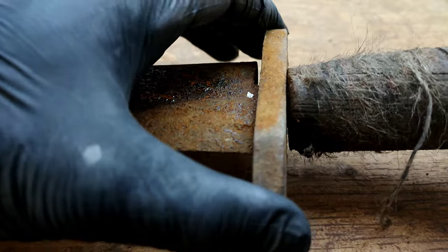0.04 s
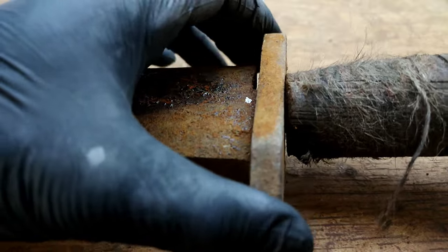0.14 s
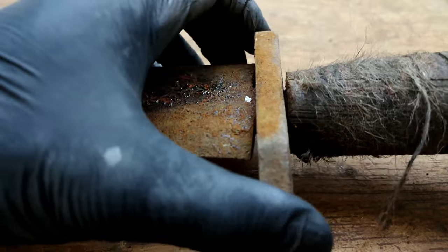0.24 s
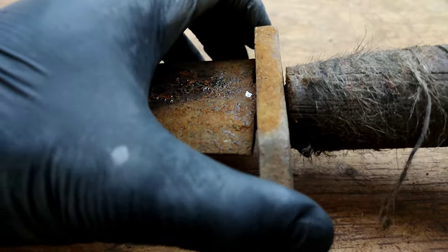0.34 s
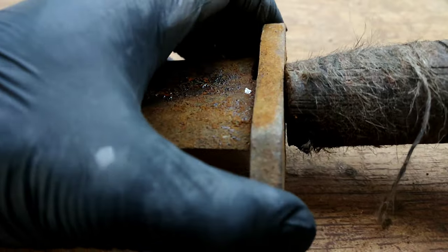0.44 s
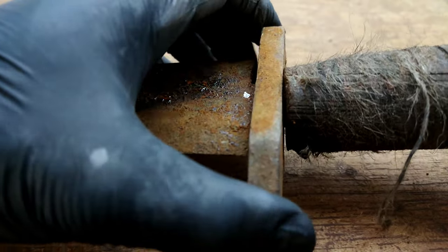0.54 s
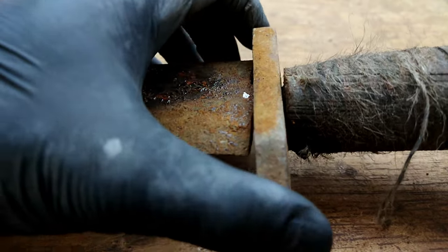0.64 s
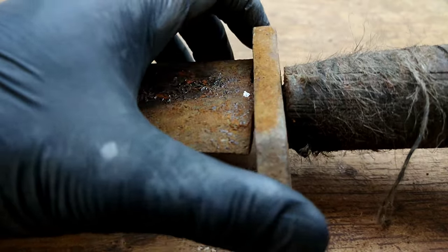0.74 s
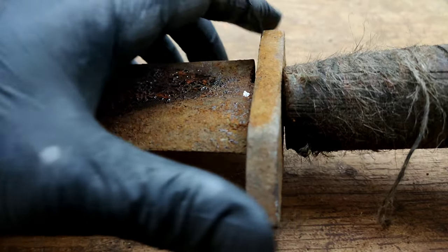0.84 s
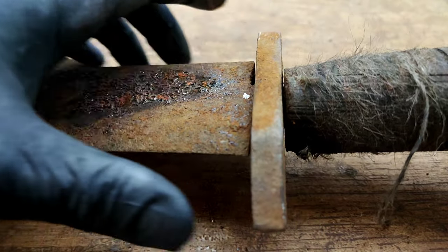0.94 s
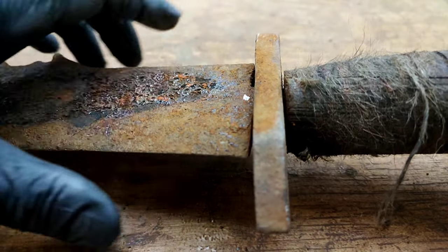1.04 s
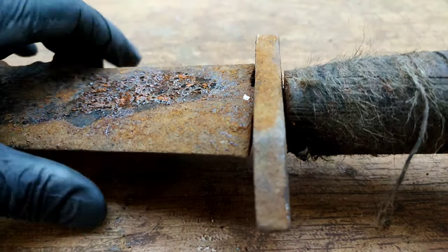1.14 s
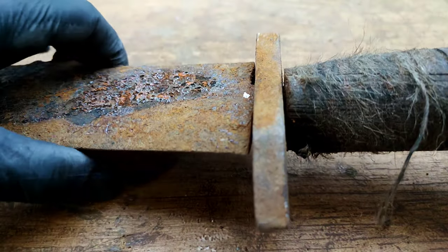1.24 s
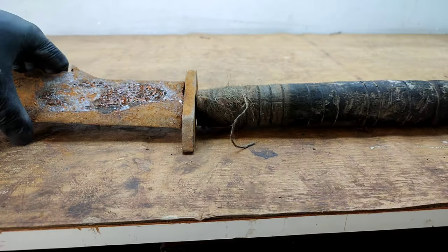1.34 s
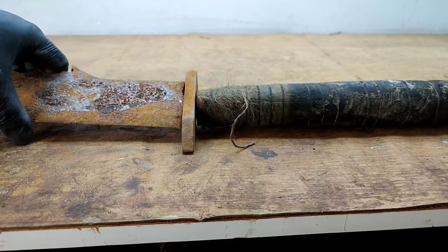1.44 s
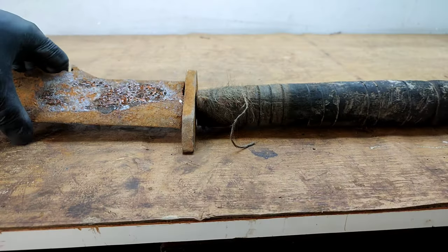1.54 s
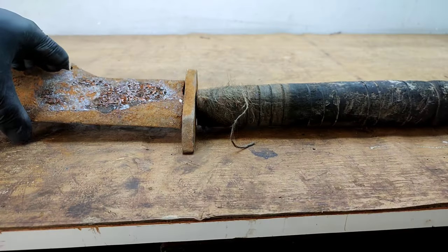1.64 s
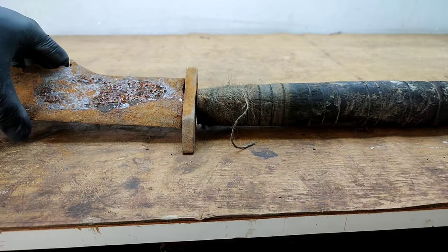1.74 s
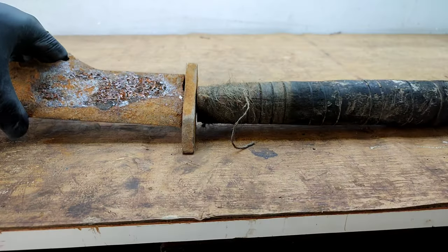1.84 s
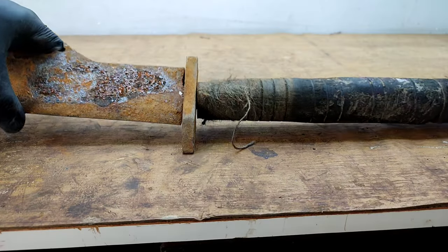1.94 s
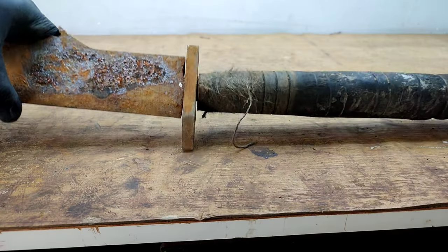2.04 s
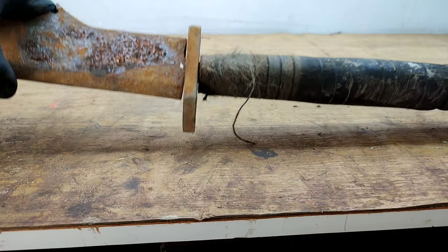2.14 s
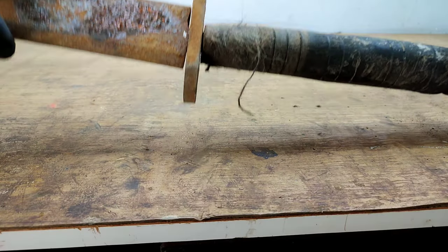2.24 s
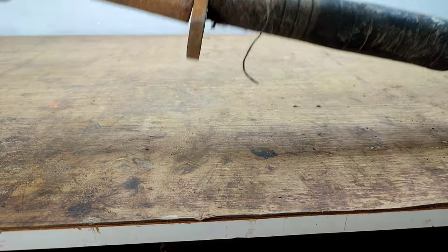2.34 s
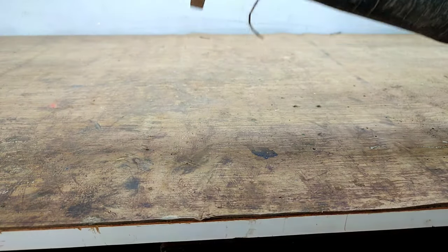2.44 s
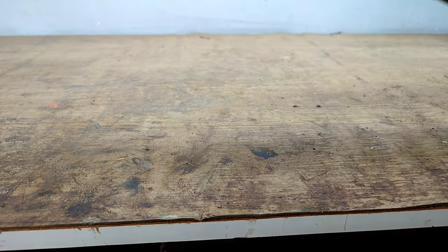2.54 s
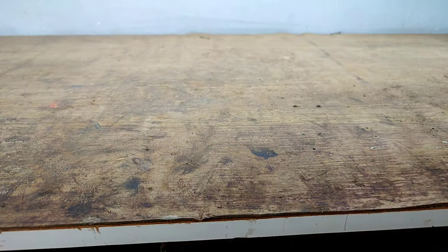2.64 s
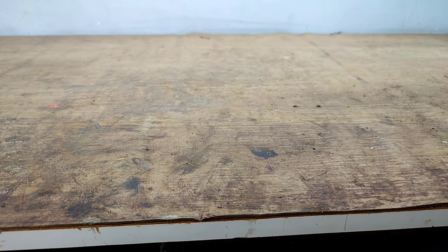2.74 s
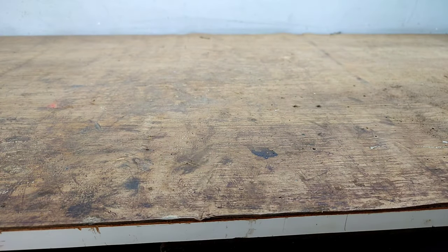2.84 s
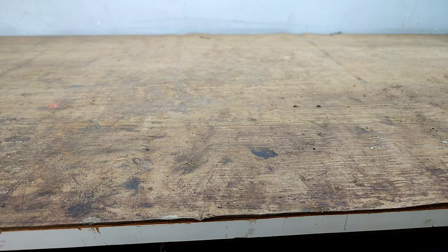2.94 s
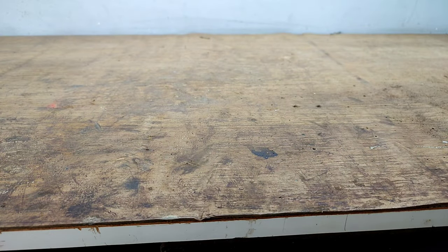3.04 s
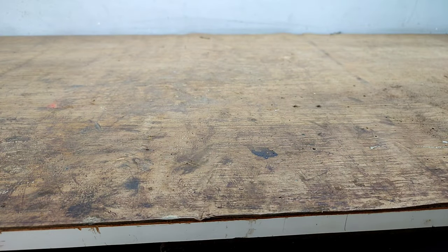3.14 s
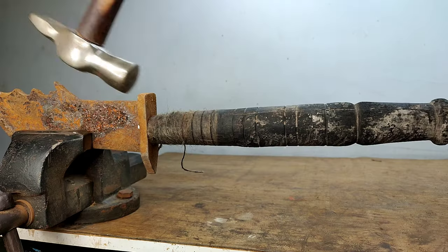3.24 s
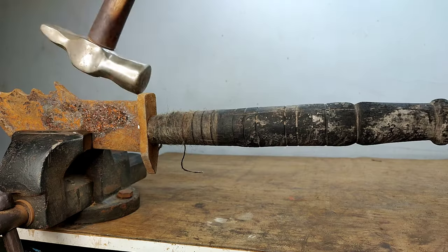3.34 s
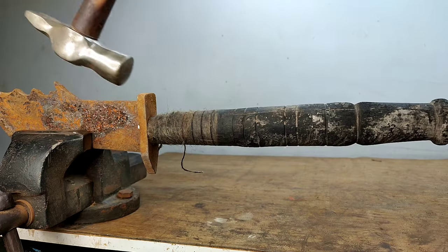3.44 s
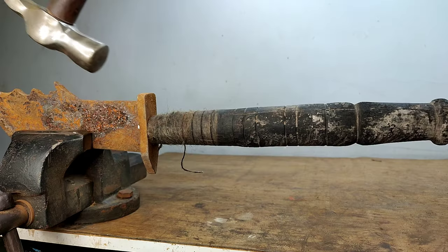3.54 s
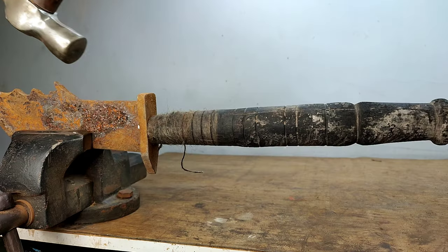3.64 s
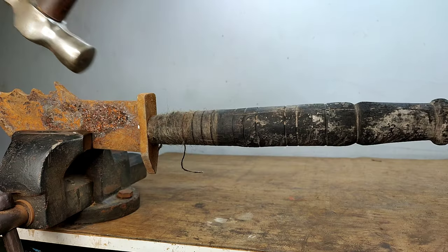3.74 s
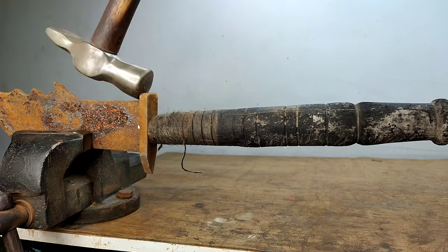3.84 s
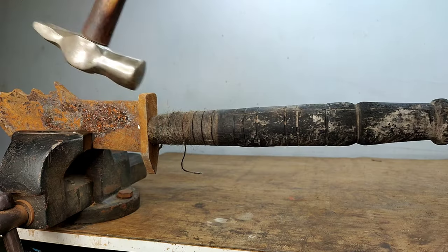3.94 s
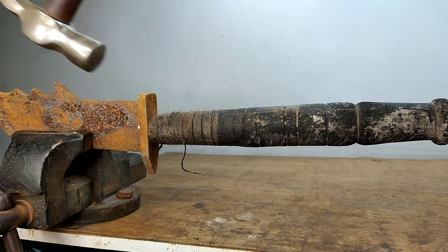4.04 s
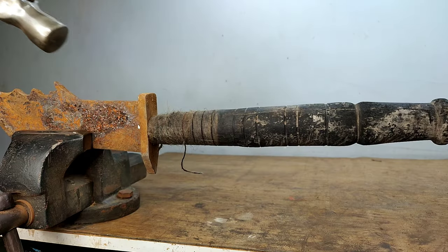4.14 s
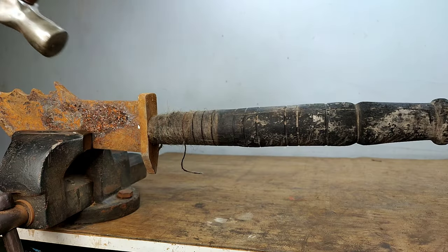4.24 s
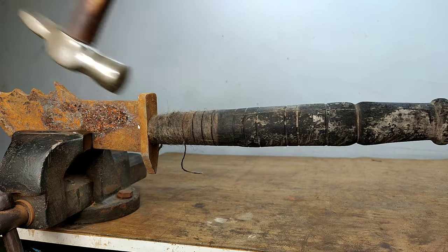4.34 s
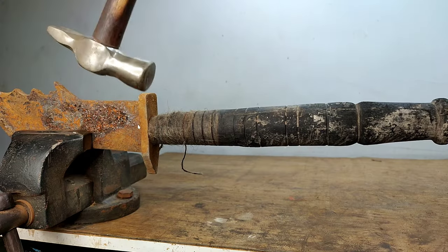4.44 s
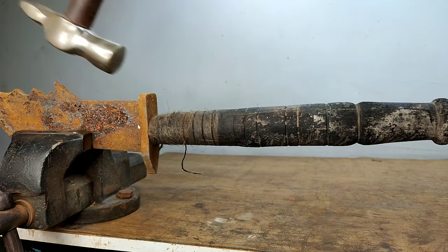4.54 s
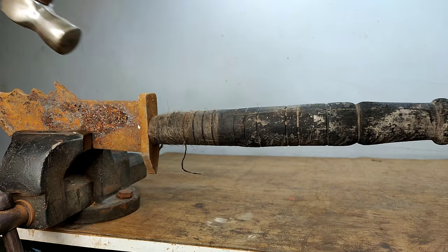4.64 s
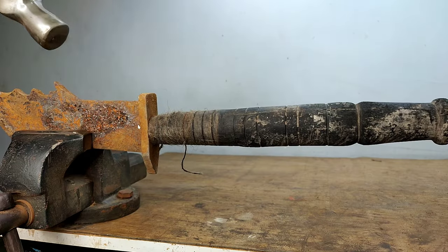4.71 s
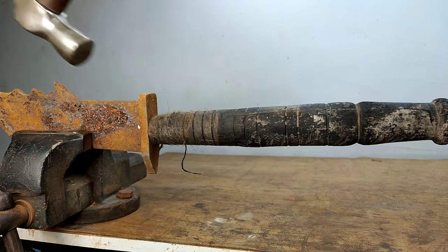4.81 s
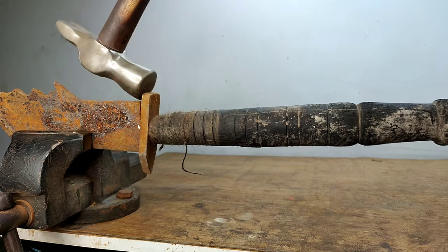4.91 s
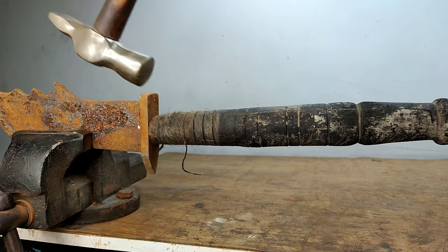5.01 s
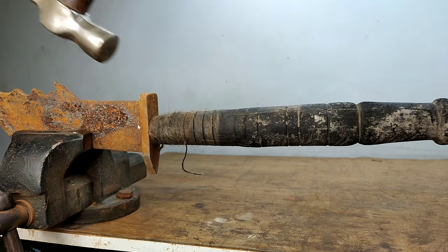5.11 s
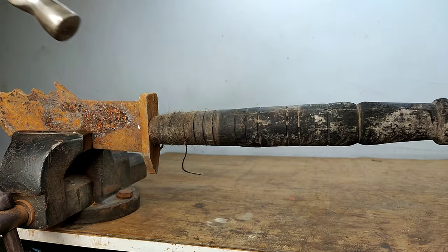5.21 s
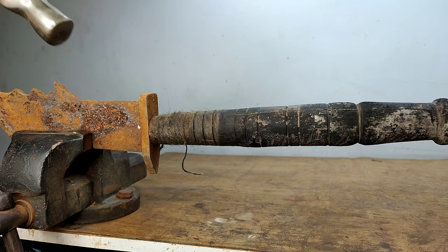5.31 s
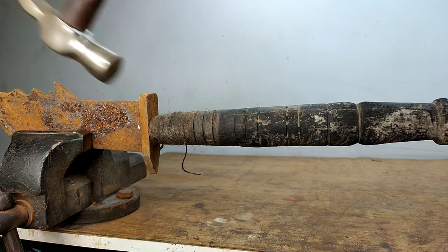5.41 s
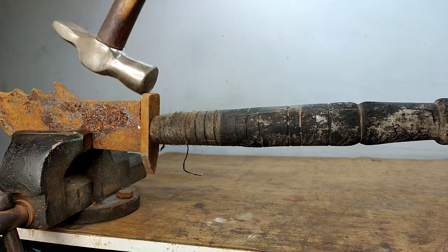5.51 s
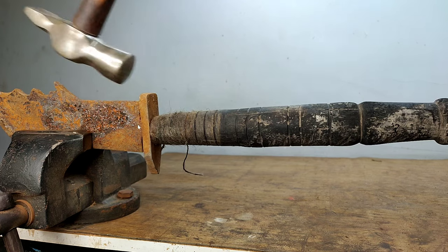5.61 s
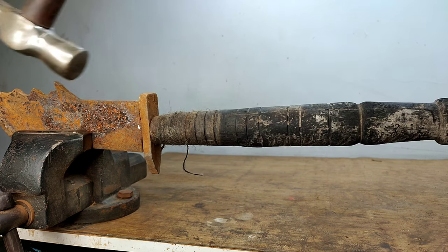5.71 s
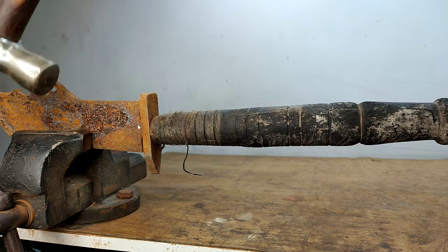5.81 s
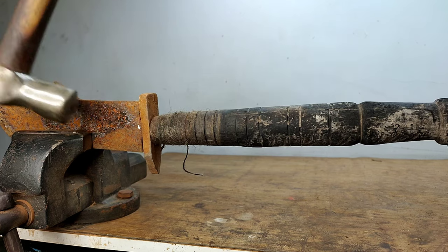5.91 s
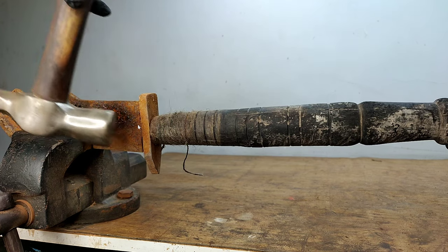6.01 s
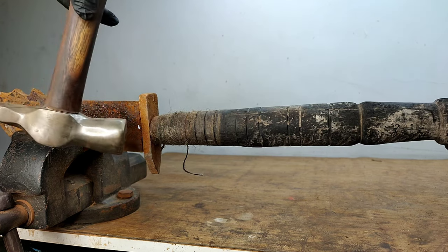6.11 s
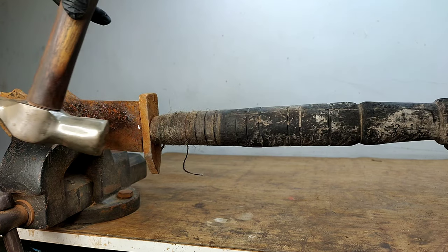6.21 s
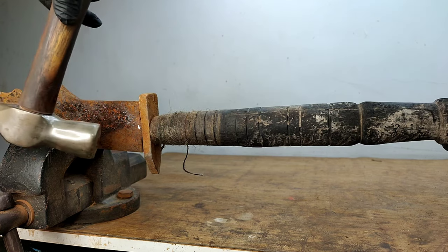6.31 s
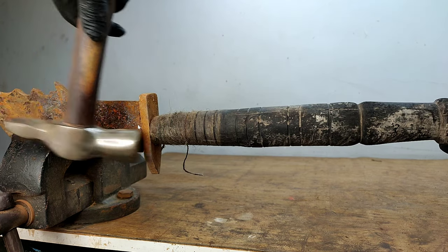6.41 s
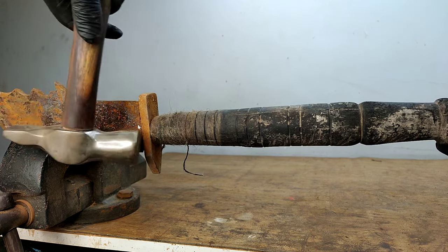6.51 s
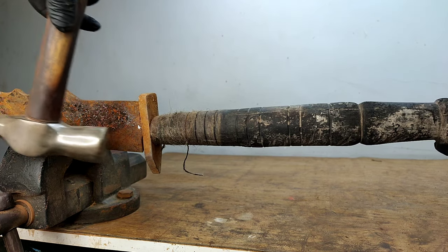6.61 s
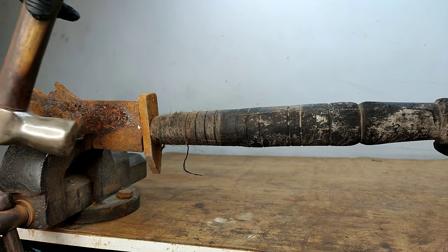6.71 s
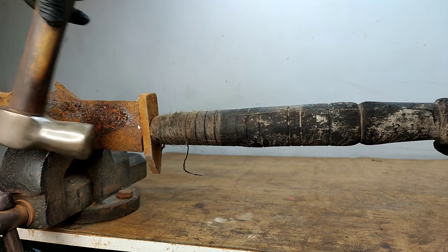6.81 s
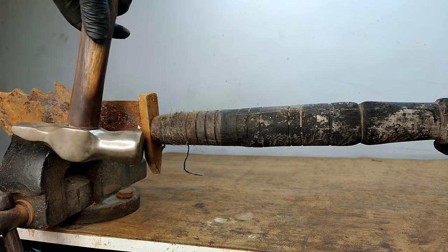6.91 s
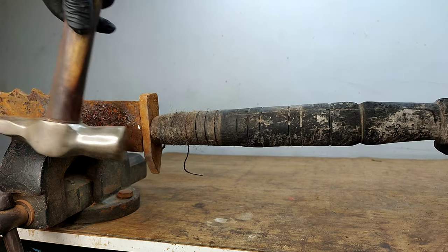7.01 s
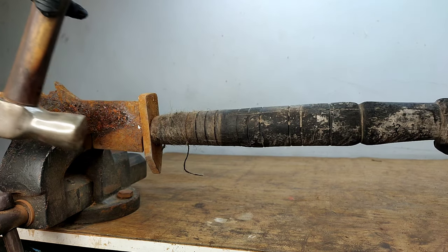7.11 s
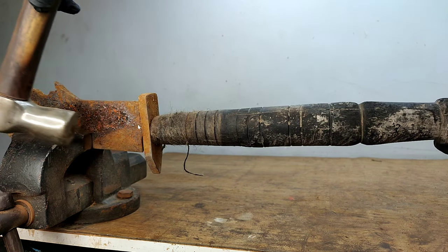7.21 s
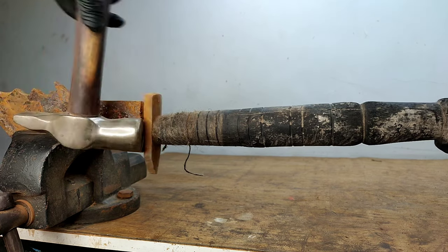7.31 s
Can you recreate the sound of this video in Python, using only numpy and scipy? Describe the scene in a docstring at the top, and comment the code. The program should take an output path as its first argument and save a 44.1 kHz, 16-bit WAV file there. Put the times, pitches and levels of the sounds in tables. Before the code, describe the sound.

After faint knocks and rubs of a sword being handled on wood, a hammer hits the clamped metal seven times with sharp, ringing clangs.

```python
"""A bare, echoing workshop; a stereo microphone close to a wooden bench, a motor humming far off.
A gloved hand shifts a rusty sword: it knocks and scrapes on the wood, rubber rubs over rust, the loose
guard clacks once, and the sword is lifted away. Then, with the blade in a vise, a hammer hits the guard
seven times. Each blow is a double steel clash that rings blade and vise, shakes the bench and fills the
room. A limiter ducks the hard blows and lets go a tenth of a second later, so their echo swells."""
import sys
import numpy as np
from scipy import signal
from scipy.fft import rfft, irfft
from scipy.io import wavfile
from scipy.ndimage import uniform_filter1d, minimum_filter1d

SR = 44100
rng = np.random.default_rng(int(sys.argv[2]) if len(sys.argv) > 2 else 0)


def unload_wav(signal):
    """Save mono or channel-first audio to the path in sys.argv[1] as 16-bit WAV at rate SR, clipped to [-1, 1]."""
    wavfile.write(
        sys.argv[1],
        SR,
        np.round(np.clip(np.atleast_2d(signal).T, -1, 1) * 32767).astype(np.int16),
    )


N = 324576
TIME = np.arange(N) / SR
AGE = np.arange(2 ** 16) / SR   # time since a contact

# decay of the workshop: f/Hz, t60/s
WORKSHOP_DECAY = [(60, 1.15), (170, 1.78), (420, 1.13), (1100, 0.96), (2900, 0.8), (6500, 0.61),
                  (10000, 0.46), (14000, 0.34)]
# likeness of the microphone's two channels in a diffuse field: f/Hz, correlation
CHANNEL_LIKENESS = [(60, 0.9), (180, 0.93), (350, 0.73), (700, 0.26), (1500, 0)]
# room tone, low rumble and faint air: f/Hz, level/dB
RUMBLE_COLOUR = [(20, 1), (50, -4.5), (70, -13), (95, 4), (120, -11), (190, -9), (250, -18.5), (500, -38.5),
                 (1000, -70.5)]
AIR_COLOUR = [(150, -26), (250, -3.5), (600, -10), (1500, -17.5), (4000, -21.5), (9000, -29), (13700, -26),
              (14900, -36.5)]
# partials of the distant motor: f/Hz, level/dB
MOTOR_HUM = [(49.7, -61.5), (94, -70), (140.5, -65.5)]

# the guard knocks and drags on the bench: t/s, level/dB, contact cut-off/Hz, scuff t60/s
SWORD_KNOCKS = [(.002, -15, 3800, 0.34), (0.053, -16.5, 4500, 0.48), (0.124, -9, 1590, 0.054),
                (0.359, -20.5, 2300, 0.37), (0.563, 1, 4000, 0.089), (0.584, -9.5, 1900, 0.058),
                (0.791, -12.5, 1780, 0.036), (0.813, -9, 2720, 0.05), (0.989, -7.5, 6500, 0.13),
                (2.209, -11, 1500, 0.032), (2.233, -5.5, 1380, 0.025)]
# modes of the loose sword lying on wood: f/Hz, level/dB, t60/s
SWORD_MODES = [(468, -57.5, 0.47), (603, -66, .5), (745, -55, 0.48), (1040, -43, 0.082),
               (1105, -55.5, 0.37), (1209, -59, 0.57), (1490, -64, 0.32), (1816, -44.5, 0.054),
               (2070, -58, 0.15), (2270, -41, 0.031)]
# a knock's scuff and its echo: f/Hz, level/dB
KNOCK_COLOUR = [(100, -71), (250, -70.5), (600, -81.5), (870, -82.5), (1050, -74), (1330, -91), (1650, -81),
                (1900, -82), (2200, -77), (2500, -86), (2750, -95), (8000, -112)]
# strokes of the glove over rust: t/s, length/s, level/dB
GLOVE_RUBS = [(0.047, .06, -71), (0.338, 0.11, -72.5), (.515, 0.051, -70), (.72, 0.074, -75),
              (0.937, .04, -65.5), (.985, 0.043, -63.5), (1.073, .02, -73), (1.142, 0.041, -71.5),
              (1.255, 0.12, -67), (1.39, 0.021, -63.5), (1.695, 0.049, -77), (1.955, 0.14, -75),
              (2.135, 0.033, -71), (2.187, 0.099, -77), (2.508, 0.082, -71)]
# rubber sliding on rust: f/Hz, level/dB
GLOVE_COLOUR = [(880, -34), (1500, -1.5), (4840, -10.5), (6340, -7.5), (13700, -15.5), (14500, -11.5),
                (14900, -32)]
# the glove sticks and snaps free: t/s, level/dB, f/Hz, t60/s
GLOVE_SNAPS = [(.27, -64, 2200, .05), (.963, -72, 7000, .08), (.993, -69, 4200, 0.074),
               (1.275, -67, 7050, 0.06), (2.178, -55, 2830, .03), (2.547, -49.5, 10500, 0.021)]
# modes of the loose guard against the blade: f/Hz, level/dB, t60/s
GUARD_MODES = [(1170, -5, .05), (1736, -2, .045), (2890, -7.5, .04)]
# the level dips briefly, then creeps back: t/s, level still missing just after/dB
LEVEL_DIPS = [(1.431, 8), (3.928, 0)]

# hammer blows: t/s, force/dB, second contact delay/s, second contact level/dB, contact cut-off/Hz,
# clang f/Hz, clang level/dB, vise f/Hz, vise level/dB, boom and thump level/dB, pan left minus right/dB
HAMMER_BLOWS = [(3.445, -6.5, 0.0062, 11, 6460, 3550, 8.5, 527, -2.5, -4, -3),
                (3.9936, -0.5, 0.0032, 4, 11700, 3540, -16, 688, 2.5, 1.5, -1),
                (4.5416, -0.5, 0.0038, 8.5, 12060, 3630, 4, 591, 0.5, 0.5, -3),
                (5.0685, -0.5, 0.0032, 8, 13060, 2730, 4, 566, 2.5, 0, -1),
                (5.6196, 1, .0038, 1.5, 12230, 3085, 1.5, 751, -1, 0.5, -2.5),
                (6.5930, -8, .0011, 3.5, 4300, 2047, 3.5, 480, -12.5, -1, -4),
                (7.05, -1, .0013, 2, 7500, 2345, 9.5, 454, -11.5, 2.5, -3.5)]
# modes of hammer head and guard clashing: f/Hz, level/dB, t60/s
CLASH_MODES = [(1027, -1.5, 0.017), (1550, -1, 0.013), (2100, -13.5, 0.03), (2846, -4, 0.016),
               (3692, -8.5, 0.039), (4600, -12.5, .02), (5240, -12, 0.017), (6160, 1.5, .018),
               (6256, 5, 0.015), (7040, 2, 0.019), (8880, -2.5, 0.016), (10340, -6.5, 0.066),
               (12280, -5, 0.024), (14100, -11.5, .022)]
# the crack of the contact, and the room's echo of it: f/Hz, level/dB
CRACK_COLOUR = [(300, -45.5), (1000, -55), (3000, -46), (7000, -46.5), (10000, -52.5), (13500, -54.5),
                (15000, -65)]
ECHO_COLOUR = [(150, -72), (380, -53.5), (720, -56.5), (860, -57.5), (1070, -54.5), (1300, -55),
               (2500, -55.5), (4200, -54.5), (5200, -57.5), (6500, -52), (8200, -58), (9600, -59.5),
               (10400, -54), (11800, -62.5), (13300, -57), (14200, -83)]
# modes of the clamped blade, the vise holding it and the rocking bench: f/Hz, level/dB, t60/s
BLADE_MODES = [(842, -39, 0.66), (999, -35, 1.21), (1090, -35, 0.83), (1340, -35, 0.36), (2263, -29, 0.64),
               (2950, -41, .7), (3466, -30, 0.65), (3800, -34, .75), (6350, -30.5, 0.44), (6500, -34, .55),
               (6600, -23, 0.6), (7600, -43.5, 0.6), (10140, -33.5, .4)]
VISE_MODES = [(445, -30, 2.1), (477.6, -28.5, 1.67), (537, -34, 1.3), (555, -29.5, 0.91), (603, -28, 1.37),
              (636, -29.5, 1.3), (679, -23.5, 1.18), (752, -28.5, 1.16), (775, -24.5, 1.1)]
BENCH_MODES = [(53.95, -17.5, 1.23), (89.3, -25, 0.83), (121.6, -31.5, 1.3), (208.3, -35, 2),
               (249, -39.5, 2), (338, -39.5, 1.8)]
# the bench's boom in the room: f/Hz, level/dB
BOOM_COLOUR = [(15, -42), (35, -40), (56, -38), (78, -40.5), (95, -43), (165, -52.5), (230, -53),
               (330, -59), (800, -63), (2000, -100)]


def from_db(db):
    return 10 ** (np.asarray(db) / 20)


def unit_rms(x):
    return x / np.sqrt(np.mean(x ** 2) + 1e-20)


def at_hz(points, hz):
    """Read a table on a log-frequency axis."""
    points = np.array(points)
    return np.interp(np.log(hz + 1e-9), np.log(points[:, 0]), points[:, 1])


def add(out, s, sound):
    """Mix a sound in from time s on."""
    start = max(int(s * SR), 0)
    part = sound[..., :out.shape[-1] - start]
    out[:, start:start + part.shape[-1]] += part


def decay(t60, age=AGE):
    return np.exp(-np.log(1000) * age / t60)


def rise(time_constant_s):
    return 1 - np.exp(-AGE / time_constant_s)


def diffuse_noise(colour, size=len(AGE)):
    """Noise reaching the microphone from all sides, alike in the bass; colour gives its density."""
    hz = np.fft.rfftfreq(size, 1 / SR)
    mid, side = rfft(rng.standard_normal((2, size)))
    alike = np.clip(at_hz(CHANNEL_LIKENESS, hz), -1, 1)
    pair = np.sqrt(1 + alike) * mid + np.sqrt(1 - alike) * side * [[1], [-1]]
    return irfft(pair * from_db(at_hz(colour, hz)), size) * np.sqrt(SR) / 2


def room_tone(rumble_db=-57.5, air_db=-72.5, louder_end_s=1.38, louder_fade_s=0.17):
    """A distant motor hums; the background rumble and hiss are louder at first and drop at about 1.4 s."""
    hum = sum(from_db(level_db) * np.sqrt(2) * np.sin(2 * np.pi * (hz * TIME + rng.random()))
              for hz, level_db in MOTOR_HUM)
    louder_start = np.clip((louder_end_s - TIME) / louder_fade_s, 0, 1)
    rumble_gain = np.hypot(from_db(rumble_db), from_db(-53.5) * louder_start)
    air_gain = np.hypot(from_db(air_db), from_db(-71) * louder_start)
    rumble = rumble_gain * unit_rms(diffuse_noise(RUMBLE_COLOUR, size=N))
    air = air_gain * unit_rms(diffuse_noise(AIR_COLOUR, size=N))
    return hum + rumble + air


def strike(modes, spread_db):
    """Modes struck with random strengths; high ones reach the two channels out of step."""
    out = np.zeros((2, len(AGE)))
    for hz, level_db, t60 in modes:
        age = AGE[:int(2 * t60 * SR)]
        apart = 1 - np.clip(at_hz(CHANNEL_LIKENESS, hz), 0, 1)
        phase = np.pi * (rng.integers(0, 2) + apart * (2 * rng.random((2, 1)) - 1))
        gain = from_db(level_db + spread_db * rng.standard_normal())
        add(out, 0, gain * np.sin(2 * np.pi * hz * age + phase) * decay(t60, age))
    return out


def room_echo(colour, ripple_db=0.0, ripple_hz=110.0):
    """The workshop answers a contact: unevenly coloured noise, each band dying at its own rate."""
    hz = np.fft.rfftfreq(len(AGE), 1 / SR)
    ripple = np.interp(hz / ripple_hz, np.arange(len(hz)), rng.standard_normal(len(hz)))
    spectrum = rfft(diffuse_noise(colour)) * from_db(ripple_db * ripple)
    centres, t60s = np.transpose(WORKSHOP_DECAY)
    bands = [at_hz(np.c_[centres, row], hz) for row in np.eye(len(centres))]
    return sum(irfft(spectrum * band) * decay(t60) for band, t60 in zip(bands, t60s))


def dull(x, cut_hz):
    """A longer contact carries less treble."""
    return signal.sosfilt(signal.butter(2, cut_hz, fs=SR, output="sos"), x + 1e-18)


def sword_knocks():
    """The sword rocks and scrapes on the bench as the hand takes hold of it."""
    out = np.zeros((2, N))
    for s, level_db, cut_hz, scuff_t60 in SWORD_KNOCKS:
        ring = strike(SWORD_MODES, spread_db=2.0)
        scuff = from_db(2.5) * diffuse_noise(KNOCK_COLOUR) * decay(scuff_t60)
        room = from_db(-13.0) * room_echo(KNOCK_COLOUR, ripple_db=7.0, ripple_hz=79.5)
        knock = dull(dull(ring + scuff + room, cut_hz), cut_hz)   # twice: wood is a soft contact
        add(out, s, from_db(level_db) * knock)
    return out


def scattered_ring(hz, width_hz, t60):
    """A resonance scattered by the room: a dying band of noise."""
    radius = np.exp(-np.pi * width_hz / SR)
    feedforward = np.array([1, 0, -1]) * (1 - radius ** 2) / 2
    feedback = [1, -2 * radius * np.cos(2 * np.pi * hz / SR), radius ** 2]
    band = rng.standard_normal((2, len(AGE)))
    for _ in range(2):
        band = signal.lfilter(feedforward, feedback, band)
    return unit_rms(band) * decay(t60)


def glove(slip_db=3.5, slips_per_s=300, attack_s=0.016, release_t60=0.16):
    """Rubber rubs over rust in strokes made of tiny slips, and now and then snaps free."""
    effort = np.zeros((1, N))
    for s, length_s, level_db in GLOVE_RUBS:
        swell = np.minimum(AGE / attack_s, 1)
        release = decay(release_t60, np.maximum(AGE - length_s, 0))
        add(effort, s, from_db(level_db) * swell * release)
    slips = np.interp(TIME * slips_per_s, np.arange(N), rng.standard_normal(N))
    out = effort * unit_rms(diffuse_noise(GLOVE_COLOUR, size=N) * from_db(slip_db * slips))
    for s, level_db, hz, t60 in GLOVE_SNAPS:
        add(out, s, from_db(level_db) * scattered_ring(hz, width_hz=0.56 * hz, t60=t60))
    return out


def guard_clack(at_s=0.99, level_db=-42):
    """The loose guard clacks against the blade as the grip shifts."""
    out = np.zeros((2, N))
    add(out, at_s, from_db(level_db) * strike(GUARD_MODES, spread_db=1))
    return out


def clash(delay_s, second_db, clang_hz, clang_db):
    """The hammer meets the guard, which slams against the blade a moment later."""
    out = np.zeros((2, len(AGE)))
    second_gain = from_db(second_db)
    for s, gain in [(0, 1), (delay_s, second_gain)]:
        steel = from_db(-12.0) * strike(CLASH_MODES, spread_db=1.5)
        # the spot that is hit adds a short clang of its own pitch
        clang = from_db(-14.0) * strike([(clang_hz, clang_db, 0.02)], spread_db=0)
        crack = diffuse_noise(CRACK_COLOUR) * decay(t60=0.036)
        add(out, s, gain * (steel + clang + crack))
    return out / np.hypot(1, second_gain)


def lasting_ring(modes, spread_db, waver_hz, sag=0.0, settle_s=0.1387):
    """Long modes waver on their way through the room; sag starts them flat while the swing is wide."""
    out = np.zeros((2, len(AGE)))
    clock = AGE - sag * settle_s * rise(settle_s)
    for hz, level_db, t60 in modes:
        age = AGE[:int(1.2 * t60 * SR)]
        # each channel hears one steady path plus shifting reflections
        paths = (1 + rng.standard_normal((2, 256)) + 1j * rng.standard_normal((2, 256))) / np.sqrt(3)
        paths *= np.exp(2j * np.pi * rng.random((2, 1)))
        waver = np.array([np.interp(age * waver_hz, np.arange(len(path)), path) for path in paths])
        tone = np.exp(2j * np.pi * hz * clock[:len(age)]) * decay(t60, age)
        gain = from_db(level_db + spread_db * rng.standard_normal())
        add(out, 0, gain * (waver * tone).real)
    return out


def vise(ring_hz, reach_hz=109.0):
    """The vise modes nearest the pitch of the blow ring most; the room scatters part of their sound."""
    modes = [(hz, level_db - 4 * ((hz - ring_hz) / reach_hz) ** 2, t60)
             for hz, level_db, t60 in VISE_MODES]
    scattered = from_db(-27.5) * scattered_ring(ring_hz, width_hz=176, t60=1.18)
    return lasting_ring(modes, spread_db=0.5, waver_hz=26.85, sag=0.1) + scattered


def mic_thump(thump_hz=6.0, thump_db=-7.0):
    """A blow overloads the microphone with one slow, deep thump."""
    swing = -np.cos(2 * np.pi * thump_hz * AGE + np.pi / 4)
    return from_db(thump_db) * swing * decay(t60=0.27) * rise(0.004)


def bench(build_s=0.025):
    """The bench booms as the room's low modes build up."""
    boom = room_echo(BOOM_COLOUR) + from_db(-2.0) * strike(BENCH_MODES, spread_db=4.0)
    return boom * rise(build_s)


def hammer(clash_db=6.5, clang_echo_db=-32.5, room_build_s=0.0039):
    """The clash reaches the microphone first; blade, vise, echo, thump and bench build up behind it."""
    out = np.zeros((2, N))
    build = rise(room_build_s)
    for (s, force_db, delay_s, second_db, cut_hz,
         clang_hz, clang_db, vise_hz, vise_db, bass_db, pan_db) in HAMMER_BLOWS:
        direct = from_db(clash_db) * clash(delay_s, second_db, clang_hz, clang_db)
        clang = from_db(clang_echo_db + clang_db) * scattered_ring(clang_hz, width_hz=600, t60=0.83)
        blade = lasting_ring(BLADE_MODES, spread_db=3.0, waver_hz=30.7)
        room = room_echo(ECHO_COLOUR, ripple_db=2.2)
        pan = from_db([[pan_db / 2], [-pan_db / 2]])
        metal = pan * direct + np.sqrt(pan) * build * (blade + room + clang)   # echo leans half as far
        vise_ring = from_db(vise_db) * build * vise(vise_hz)
        bass = from_db(bass_db) * (mic_thump() + bench())
        add(out, s, from_db(force_db) * dull(metal, cut_hz) + vise_ring + bass)
    return out


def limiter(x, threshold_db=-10.0, hold_s=0.091, release_s=0.0026, sense_s=0.0052):
    """Looks ahead, turns a loud burst down, holds the gain and then lets go quickly."""
    hold, ahead = int(hold_s * SR), int(sense_s * SR)
    power = uniform_filter1d(np.mean(x ** 2, axis=0), ahead)
    wanted = np.minimum(1, from_db(threshold_db) / np.sqrt(np.abs(power) + 1e-12))
    held = np.roll(minimum_filter1d(wanted, hold, origin=(hold - 1) // 2), -ahead)
    pole = np.exp(-1 / (release_s * SR))
    released = 1 - signal.lfilter([1 - pole], [1, -pole], 1 - held)
    return x * np.minimum(held, released)


def scene():
    """The workshop as heard through the microphone by the bench."""
    return room_tone() + sword_knocks() + glove() + guard_clack() + hammer()


def record(dry, dip_half_width_s=0.0061, recovery_s=0.088, top_cut_hz=14300):
    """Behind the microphone: limiter, rounded peaks, two brief dips in level and a steep top cut."""
    x = 1.168 * np.tanh(limiter(dry) / 1.222)
    for s, missing_db in LEVEL_DIPS:
        away_s = np.abs(TIME - s)
        gap = np.clip(4 * away_s / dip_half_width_s - 3, 0, 1)
        recovery = from_db(-missing_db * (TIME > s) * np.exp(-away_s / recovery_s))
        x = x * gap * recovery
    return signal.sosfilt(signal.ellip(10, 0.1, 80, top_cut_hz, fs=SR, output="sos"), x)


dry = scene()
out = record(dry)
unload_wav(out)
```